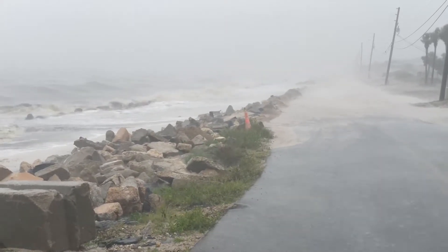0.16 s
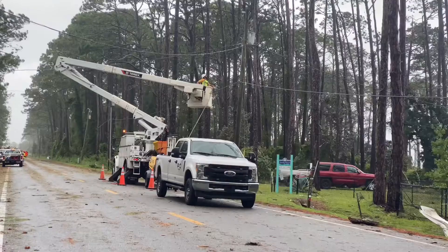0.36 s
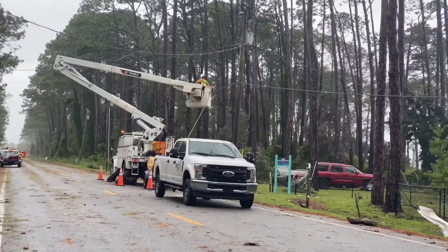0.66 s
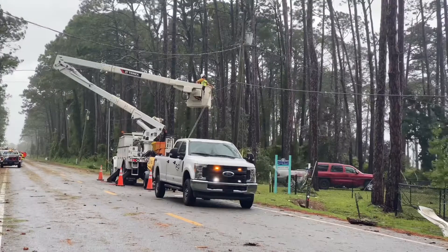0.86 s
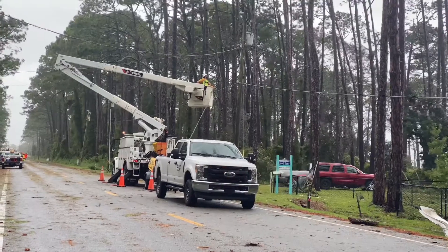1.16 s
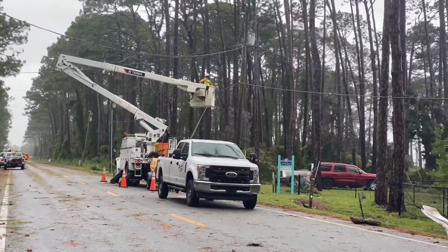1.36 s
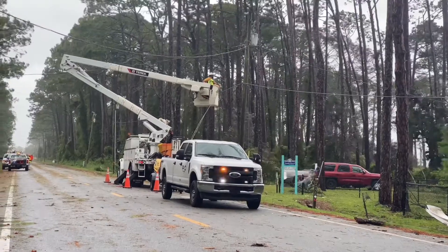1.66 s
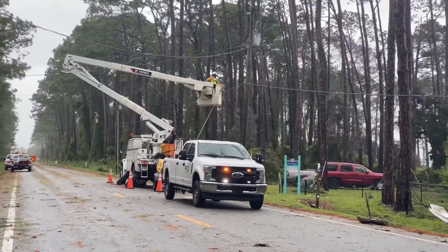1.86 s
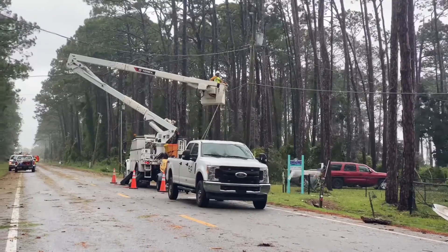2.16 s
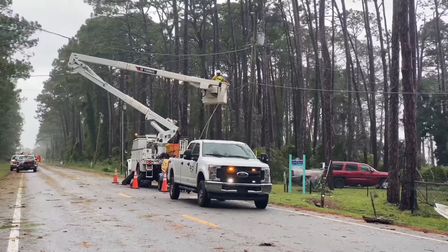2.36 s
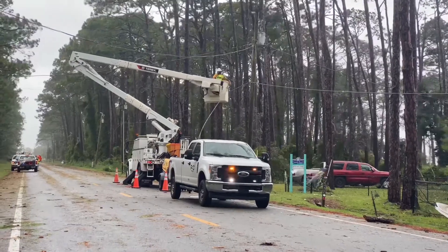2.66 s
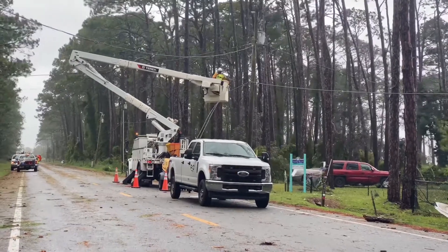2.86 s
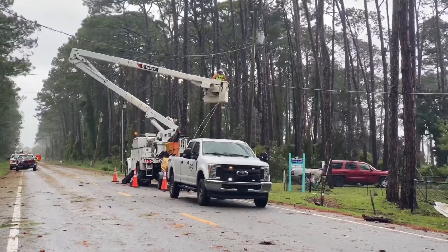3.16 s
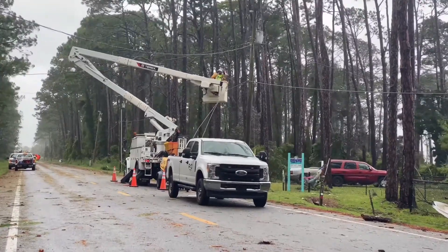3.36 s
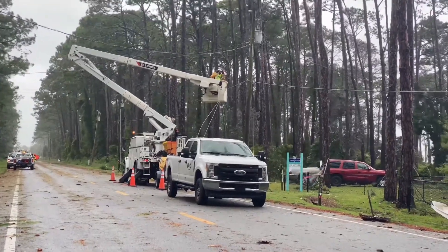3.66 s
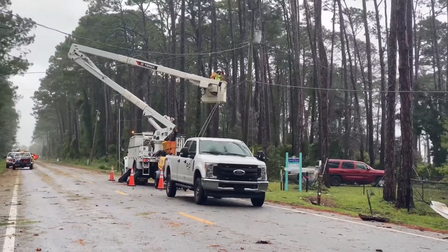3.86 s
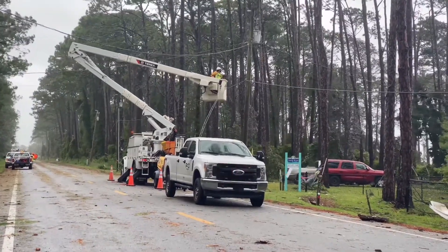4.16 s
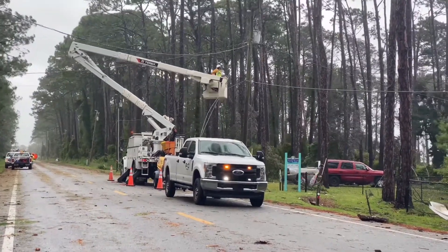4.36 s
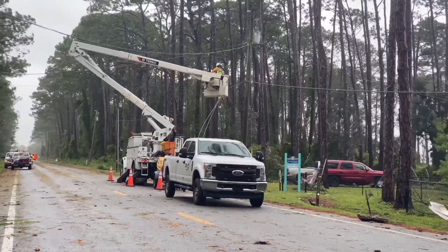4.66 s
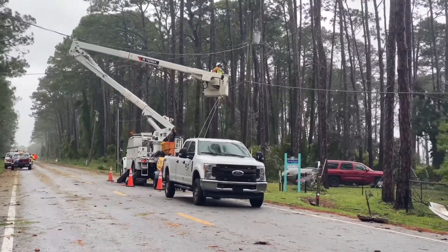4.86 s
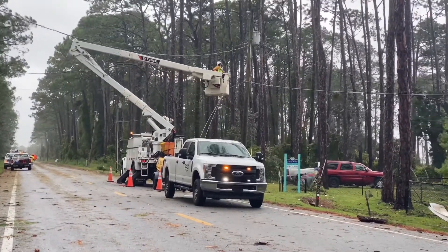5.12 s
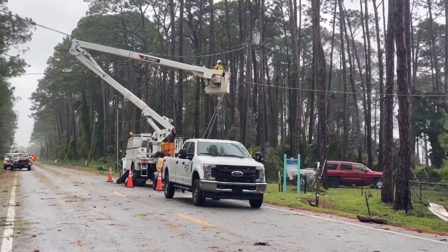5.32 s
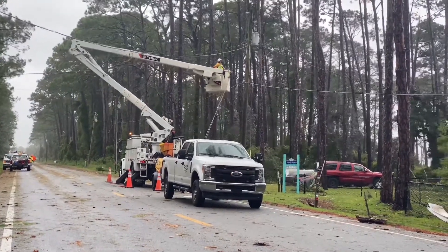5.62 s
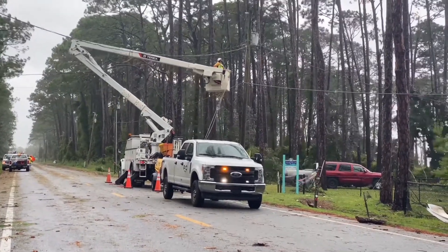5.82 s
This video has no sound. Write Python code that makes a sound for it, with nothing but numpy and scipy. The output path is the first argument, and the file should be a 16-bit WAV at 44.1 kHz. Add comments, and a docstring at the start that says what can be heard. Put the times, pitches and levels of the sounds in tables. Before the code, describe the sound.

From 0 to about 0.3 s, surf on an exposed shore hisses broadly above a soft, deep wind rumble. It dips to silence near 0.34 s, and wind among tall pines quickly rises, lasting to the end at about 6 s. The needles give a steady, bright hiss with little bass; the crowns add a mild mid-pitched rush that slowly swells and sinks. Low gusts flutter at the hand-held stereo microphone, busiest from 0.4 to 1.1 s, with a tight cluster of muffled knocks and one tick around 0.8-0.96 s. Then it is calmer, with scattered light rustles and a small tick near 2.05 s. A soft gust swells around 3.8 s. At 4.3-4.5 s come more knocks, the strongest a low thump at 4.5 s, with dry debris ticks. Sparse ticks follow at 4.8-5.15 s, then mostly even hiss with faint puffs. The trucks and worker are not heard.

```python
"""Surf on an exposed shore is heard first; it fades to silence and a stand of tall pines fades in.
Surf, needles and crowns are random noise shaped in pitch and level; gusts add power to a breeze.
Short bursts of noise buffet the two ports of a hand-held microphone, from the shore onwards.
Among the pines come damped sine knocks and the sharp, band-passed ticks of blown debris."""
import sys
import numpy as np
from scipy import signal
from scipy.fft import rfft, irfft
from scipy.io import wavfile
from scipy.ndimage import uniform_filter1d

SR = 44100
rng = np.random.default_rng(int(sys.argv[2]) if len(sys.argv) > 2 else 0)


def put_to_file(sound):
    """Save the sound as 16-bit audio at rate SR, in the file named by the first command-line argument."""
    columns = np.atleast_2d(sound).T  # one column per channel
    safe = np.clip(columns, -1, 1)
    whole_steps = np.round(safe * 32767)
    wavfile.write(sys.argv[1], SR, whole_steps.astype(np.int16))


N = 264047
TIME = np.arange(N) / SR
HZ = np.fft.rfftfreq(1024, 1 / SR)  # pitches of the noise frames
FRAME_S = np.arange(N // 256 + 5) * 256 / SR  # times of the noise frames

# Wind on the shore. Each row: time in seconds, rumble level in dB, surf level in dB.
SHORE_LEVELS = [(0, -46.5, -36.5), (.1, -48, -38.5), (.3, -45, -37.5)]
# Spectrum of the surf. Each row: frequency in Hz, density in dB per Hz, relative.
SURF_COLOUR = [(150, -43), (400, 3.5), (1200, 2.5), (1900, 6), (3000, 1), (4500, -1), (7000, -4),
               (8500, 2.5), (12000, -1), (14000, 2.5), (15700, -4)]
# Spectrum of the wind rumble on the shore. Each row: frequency in Hz, density in dB per Hz, relative.
RUMBLE_COLOUR = [(20, -14), (45, 0), (75, 1.5), (130, -3), (250, -5), (500, -18), (2000, -60)]
# Likeness of the two ports on the shore. Each row: frequency in Hz, coherence from 0 to 1.
SURF_COHERENCE = [(300, 1), (700, 0.61), (1400, 0.13), (3000, 0.94), (4000, 1), (7000, 1), (8000, 0.97),
                  (15000, 0.66)]
# Short flurries of air, from low buffets to light rustles.
# Each row: time of the peak in seconds, rms level at the peak in dB, pitch in Hz, length in seconds.
FLURRIES = [(0.275, -42, 814, 0.008), (0.46, -33.5, 252, 0.018), (0.485, -38, 770, 0.024),
            (0.537, -31, 620, 0.005), (0.669, -35, 450, 0.005), (0.795, -36, 403, 0.026),
            (0.821, -26.5, 434, 0.018), (0.827, -28.5, 760, 0.009), (0.838, -26.5, 330, 0.011),
            (0.853, -31, 280, 0.012), (0.884, -33, 450, 0.011), (0.917, -32.5, 470, 0.01),
            (0.939, -32, 330, 0.008), (0.959, -31, 284, 0.018), (0.974, -35, 290, 0.009),
            (0.996, -33, 306, 0.009), (1.016, -33, 432, 0.014), (1.033, -31, 470, 0.012),
            (1.083, -34, 680, 0.009), (1.385, -42, 450, 0.013), (1.651, -36, 624, 0.014),
            (1.75, -38, 780, 0.02), (1.815, -36, 730, 0.0097), (1.824, -60, 188, 0.011),
            (1.881, -36, 570, 0.012), (1.926, -34, 880, 0.014), (2.053, -34, 780, 0.007),
            (2.084, -46, 350, 0.0058), (2.109, -42, 420, 0.006), (2.183, -44, 450, 0.006),
            (2.204, -44, 500, 0.005), (2.33, -40, 547, 0.0067), (2.366, -34.5, 835, 0.0061),
            (2.483, -34, 950, 0.006), (2.778, -45, 230, 0.016), (2.831, -47, 220, 0.012),
            (3.342, -48, 280, 0.009), (3.374, -34.5, 690, 0.0065), (3.446, -39.5, 280, 0.014),
            (3.499, -41, 254, 0.012), (3.529, -41, 245, 0.018), (3.68, -46, 646, 0.021),
            (3.771, -40.5, 270, 0.018), (3.825, -39, 603, 0.0081), (3.861, -36, 263, 0.012),
            (3.922, -38, 406, 0.0074), (4.259, -36, 417, 0.011), (4.302, -36, 646, 0.0078),
            (4.353, -43, 395, 0.023), (4.402, -42, 436, 0.036), (4.438, -35, 1100, 0.006),
            (4.45, -33.5, 420, 0.018), (4.472, -31.5, 900, 0.008), (4.496, -31.5, 290, 0.017),
            (4.497, -34, 940, 0.012), (4.657, -44, 370, 0.014), (4.796, -30, 1110, 0.007),
            (4.824, -35, 1130, 0.0083), (4.944, -32, 780, 0.0071), (4.959, -35, 850, 0.0039),
            (5.033, -35, 890, 0.0049), (5.366, -37, 890, 0.0067), (5.743, -35, 676, 0.0067),
            (5.771, -45, 405, 0.007), (5.817, -47, 380, 0.0086), (5.88, -53, 340, 0.012)]
# Rush of the air through the crowns. Each row: time in seconds, level in dB before the low cut.
CROWN_LEVELS = [(0.5, -37.5), (0.7, -38), (0.97, -36.5), (1.45, -40.5), (1.68, -39), (1.78, -45),
                (1.87, -39.5), (2.2, -38), (2.6, -38.5), (3.3, -42.5), (4.0, -39.5), (4.13, -44.5),
                (4.38, -41.5), (4.46, -38), (4.9, -38), (5.03, -36.5), (5.2, -39.5), (5.5, -41),
                (5.95, -40.5)]
# Breeze near the ground. Each row: time in seconds, level in dB before the low cut.
BREEZE_LEVELS = [(0.5, -41.5), (1.2, -46.5), (1.35, -44), (1.65, -42.5), (1.76, -47), (1.97, -50),
                 (2.15, -45.5), (2.58, -48), (2.95, -42.5), (3.2, -43.5), (3.4, -41.5), (3.7, -39.5),
                 (4.0, -44), (4.28, -42.5), (4.58, -45.5), (4.68, -47), (4.8, -48), (5.25, -50.5),
                 (5.8, -46)]
# Gusts on top of the breeze. Each row: time of the peak in seconds, level in dB, length in seconds.
GUSTS = [(0.473, -34.5, 0.089), (0.68, -37.5, 0.023), (0.856, -37.5, 0.11), (0.99, -38, 0.081),
         (2.09, -48.5, 0.062), (2.812, -43.5, 0.055), (3.353, -46, 0.025), (3.5, -41.5, 0.039),
         (3.826, -36, 0.089), (4.3, -50, 0.07), (4.468, -43, 0.043)]
# Spectrum of the needles' hiss. Each row: frequency in Hz, density in dB per Hz, relative.
NEEDLE_COLOUR = [(300, -12.5), (900, 4), (2000, 1), (3000, 1), (3600, 0.5), (5000, -0.8), (6500, -3),
                 (7500, -4), (8400, 1.5), (10000, -1.5), (12000, -8.5), (14000, -6.5), (15600, -8.5)]
# Spectrum of the crowns' roar. Each row: frequency in Hz, density in dB per Hz, relative.
CROWN_COLOUR = [(300, -36), (700, -9.5), (1100, -3.5), (1450, -3), (1900, 2), (2400, -2.5), (2900, -3.5),
                (3600, -14.5), (7000, -20.5)]
# Spectrum of the wind near the ground. Each row: frequency in Hz, density in dB per Hz, relative.
GUST_COLOUR = [(100, 2.5), (280, -3), (450, 0), (740, 4), (1000, -4.5), (1400, -27.5), (2500, -26),
               (6000, -51)]
# Likeness of the ports for needles and crowns. Each row: frequency in Hz, coherence from 0 to 1.
PINE_COHERENCE = [(100, 0.27), (260, 0.62), (420, 1), (620, 0.97), (900, 0.87), (1300, 0.71), (1900, 1),
                  (2400, 1), (7000, 1), (8000, 0.89), (15000, 1)]
# Likeness of the ports for gusts, less alike in the bass. Each row: frequency in Hz, coherence.
GUST_COHERENCE = [(100, 0.2), (240, 0.4), (330, 0.8), (450, 0.92), (650, 0.97), (900, 0.9), (1300, 0.7),
                  (2000, 1)]
# Bands of the low roar that hollow out for a while.
# Each row: start in seconds, end in seconds, depth in dB, centre in Hz, width in octaves.
HOLLOWS = [(1.055, 1.3, 8, 270, .4), (1.64, 1.72, 14, 230, 0.44), (1.71, 1.792, 20, 410, 0.37),
           (1.898, 2.043, 16, 310, .35), (1.925, 2.04, 20, 620, .2), (2.185, 2.28, 7, 523, 0.44),
           (2.375, 2.463, 20, 630, .18), (2.47, 2.75, 6, 500, 0.5), (2.62, 2.755, 14, 240, .4),
           (3.016, 3.31, 42, 270, 0.6), (4.54, 4.604, 9, 520, .7), (4.77, 4.935, 16, 350, .4),
           (5.25, 5.72, 12, 280, 0.53), (5.905, 6.1, 28, 303, 0.57)]
# Low knocks and thumps. Each row: time of the peak in seconds, peak level in dB, pitch in Hz.
KNOCKS = [(0.412, -32, 323), (0.42, -40, 180), (0.535, -30, 330), (0.67, -39, 210), (0.752, -27.5, 430),
          (0.824, -20, 467), (0.84, -25.5, 308), (0.855, -29, 268), (0.883, -23.5, 306), (0.96, -28, 370),
          (1.828, -55, 63), (1.88, -54, 65), (2.069, -52, 196), (2.11, -56, 200), (4.322, -29, 166.4),
          (4.346, -47, 165), (4.368, -48, 168), (4.446, -23.5, 430), (4.473, -27, 413), (4.482, -31, 270),
          (4.498, -18, 143), (4.498, -23, 292), (4.839, -54.5, 88), (4.915, -68, 76)]
# Ticks of blown debris. Each row: start in seconds, peak level in dB, centre in Hz, decay in seconds.
TICKS = [(0.819, -24, 800, 0.0018), (2.054, -27, 1300, 0.004), (4.2997, -29, 1050, 0.0022),
         (4.438, -31, 1100, 0.003), (4.470, -21, 1100, 0.001), (4.823, -26, 1510, 0.0018),
         (4.942, -28, 1100, 0.0017), (5.038, -29, 1400, 0.002), (5.14, -30, 1700, 0.002)]

FADE_S, FADE_OUT_S, FADE_IN_S = 0.338, 0.055, 0.056  # moment of silence, and the ramps around it
# the right port leads above the split; the two would be in phase at the aligned pitch
PORT_LAG_S, PORT_SPLIT_HZ, PORT_ALIGNED_HZ = .000278, 7650, 6700
# width of a flurry in octaves below its pitch, and above it for a pitch of MIDDLE_HZ;
# higher flurries spread wider upwards, by this power of the pitch
MIDDLE_HZ, SKIRT_BELOW, SKIRT_ABOVE, SKIRT_GROWTH = 900, 0.25, 1.01, 0.23
NEEDLES_DB = -36.5  # steady hiss, before the low cut
# stronger wind reaches lower: lowest pitch at the usual level, the gain in level that lowers it
# an octave, and the pitch that not even the hardest gust reaches below
USUAL_DB, LOWEST_HZ, DB_PER_OCTAVE, DEEPEST_HZ = -43, 322.05, 11, 190
HOLLOW_EDGE_S = 0.0094  # how quickly a hollow opens and closes
# length of a knock at DEEP_HZ, and the power of pitch by which higher knocks are shorter
DEEP_HZ, KNOCK_S, KNOCK_SHORTENING = 150, 0.014, 0.63
KNOCK_LEAD_RAD = 1.9  # phase between the ports at DEEP_HZ, less on either side
RING_ON_DB, RING_ON_S = -17, 0.011  # faint ringing of the body after a knock: start and decay
TICK_SNAP = 5.4  # height of the first snap against the rms of the crackle at its start
EDGE_HZ = 15650  # upper band limit


def gain_of(db):
    """Logarithmic level: decibels to an amplitude factor."""
    return 10 ** (np.asarray(db) / 20)


def evened(x):
    """Normalisation: scales to an rms of one."""
    return x / np.sqrt(np.mean(x ** 2) + 1e-20)


def read(points):
    """Interpolation along logarithmic pitch: a table over frequency, read at every bin."""
    f, value = np.transpose(points)
    return np.interp(np.log(HZ + 1), np.log(f + 1), value)


def follow(rows, axis=1):
    """Linear interpolation in time: one column of a curve, read at every frame."""
    rows = np.array(rows)
    return np.interp(FRAME_S, rows[:, 0], rows[:, axis])[:, None]


def swell(t, length, rise):
    """Gaussian envelope: a bell around t = 0 whose rise is a given share of its dying length."""
    return np.exp(-(t / np.where(t < 0, rise * length, length)) ** 2)


def eddies(flicker_db, patchy_db):
    """Turbulent modulation in dB: a flicker shared by all pitches, and patches that come and go."""
    flicker = rng.standard_normal((len(FRAME_S), 1))
    flicker = evened(uniform_filter1d(flicker, size=3, axis=0))
    patches = rng.standard_normal((len(FRAME_S), len(HZ)))
    patches = uniform_filter1d(patches, size=9, axis=0)  # smooth in time
    patches = evened(uniform_filter1d(patches, size=14, axis=1))  # smooth in pitch
    return flicker_db * flicker + patchy_db * patches


def air(colour, level_db, coherence):
    """Partial coherence: coloured noise at two ports, part shared; one leads in the top treble."""
    a, b, c, d = rng.standard_normal((4, len(FRAME_S), len(HZ)))
    same = np.clip(read(coherence), -1, 1)
    left = a + 1j * b
    right = same * left + np.sqrt(1 - same ** 2) * (c + 1j * d)
    lead_hz = (HZ - PORT_ALIGNED_HZ) * (HZ > PORT_SPLIT_HZ)
    right = right * np.exp(2j * np.pi * PORT_LAG_S * lead_hz)
    spectra = np.array([left, right]) * evened(gain_of(read(colour))) * gain_of(level_db)
    noise = signal.istft(spectra.transpose(0, 2, 1), nperseg=1024, noverlap=768)[1]
    return noise[:, :N] / np.sqrt(341)  # overlapped random frames have a power of about 341


def shore():
    """Superposed noise sources: spray hisses over the breakers, wind rumbles on the microphone."""
    surf_db = follow(SHORE_LEVELS, axis=2) + eddies(flicker_db=1.3, patchy_db=1.7)
    surf = air(SURF_COLOUR, surf_db, SURF_COHERENCE)
    rumble_db = follow(SHORE_LEVELS) + eddies(flicker_db=3.5, patchy_db=1.5)
    rumble = air(RUMBLE_COLOUR, rumble_db, SURF_COHERENCE)
    return surf + rumble.mean(0)  # the rumble is the same at both ports


def flurries(rise=0.51, apart=0.081, size=8192):
    """Filtered turbulence: bursts cut steeply below a pitch; the lower, the more the ports differ."""
    out = np.zeros((2, N))
    hz = np.fft.rfftfreq(size, 1 / SR)
    for s, db, pitch_hz, length in FLURRIES:
        start = round(s * SR) - size // 2
        shape = swell(TIME[start:start + size] - s, length, rise)
        octaves = np.log2((hz + 1) / pitch_hz)
        above = SKIRT_ABOVE * (pitch_hz / MIDDLE_HZ) ** SKIRT_GROWTH
        skirt = np.where(octaves < 0, SKIRT_BELOW, above)
        bursts = rfft(shape * rng.standard_normal((2, size)))
        shared, own = irfft(bursts * np.exp(-(octaves / skirt) ** 2))
        difference = apart * MIDDLE_HZ / pitch_hz * evened(own)
        ports = evened(shared) + difference * np.array([[1], [-1]])
        out[:, start:start + size] += gain_of(db) * np.sqrt(np.mean(shape ** 2)) * ports
    return out


def ground_wind():
    """Addition of powers: level in dB of the breeze near the ground together with its gusts."""
    power = gain_of(follow(BREEZE_LEVELS)) ** 2
    for s, db, length in GUSTS:
        gust = gain_of(db) * swell(FRAME_S - s, length, rise=1)
        power = power + gust[:, None] ** 2
    return 10 * np.log10(power)


def low_edge(wind_db, steep_db=95, most_db=75):
    """High-pass loss in dB, steep then levelling off; its edge sinks as the wind blows harder."""
    lowest_hz = LOWEST_HZ * 2 ** ((USUAL_DB - wind_db) / DB_PER_OCTAVE)
    lowest_hz = np.maximum(lowest_hz, DEEPEST_HZ)
    octaves_below = np.maximum(np.log2(lowest_hz / (HZ + 1)), 0)
    return -most_db * np.tanh(steep_db * octaves_below / most_db)


def hollows():
    """Band-stop loss in dB: a band of the low roar drops out and comes back abruptly."""
    t, loss = FRAME_S[:, None], 0
    for start, end, db, hz, octaves in HOLLOWS:
        opened = np.tanh((t - start) / HOLLOW_EDGE_S)
        closed = np.tanh((t - end) / HOLLOW_EDGE_S)
        band = np.exp(-(np.log2((HZ + 1) / hz) / octaves) ** 2)
        loss = loss - db * (opened - closed) / 2 * band
    return loss


def pines():
    """Broadband wind noise: needles hiss evenly, crowns swell and sink, near gusts flutter."""
    wind_db = ground_wind()
    cut_db = low_edge(wind_db) + hollows()
    hiss_db = NEEDLES_DB + cut_db + eddies(flicker_db=0.43, patchy_db=1.07)
    hiss = air(NEEDLE_COLOUR, hiss_db, PINE_COHERENCE)
    rush_db = follow(CROWN_LEVELS) + cut_db + eddies(flicker_db=0.14, patchy_db=1.2)
    rush = air(CROWN_COLOUR, rush_db, PINE_COHERENCE)
    gust_db = wind_db + cut_db + eddies(flicker_db=2.0, patchy_db=1.53)
    gust = air(GUST_COLOUR, gust_db, GUST_COHERENCE)
    return hiss + rush + gust


def knocks(rise=0.6, rough_rad=0.16):
    """Damped oscillation: a quick swell, a few uneven cycles, and ports that feel it out of step."""
    out = np.zeros((2, N))
    for s, db, hz in KNOCKS:
        t = TIME - s
        length = KNOCK_S * (DEEP_HZ / hz) ** KNOCK_SHORTENING
        ring_on = (t > 0) * gain_of(RING_ON_DB) * np.exp(-abs(t) / RING_ON_S)
        shape = np.maximum(swell(t, length, rise), ring_on)
        lead = KNOCK_LEAD_RAD * min(DEEP_HZ / hz, hz / DEEP_HZ)
        # slow random phase makes the cycles uneven
        grit = uniform_filter1d(rng.standard_normal(N), size=70)
        grit = evened(uniform_filter1d(grit, size=70))
        phase = 2 * np.pi * (hz * t + rng.random()) + rough_rad * grit
        ring = np.sin(phase + np.array([[0], [lead]]))
        high_pass = signal.butter(3, hz / 2, "high", fs=SR, output="sos")
        out += signal.sosfiltfilt(high_pass, gain_of(db) * shape * ring)
    return out


def ticks():
    """Impulse excitation: a snap and a heavily damped crackle, filtered about two octaves wide."""
    out = np.zeros(N)
    for s, db, hz, decay in TICKS:
        burst = rng.standard_normal(N) * (TIME >= s) * np.exp(-abs(TIME - s) / decay)
        burst[round(s * SR)] += TICK_SNAP
        band_pass = signal.butter(4, [hz / 2, hz * 2], "band", fs=SR, output="sos")
        tick = signal.sosfilt(band_pass, burst + 1e-18)
        out += gain_of(db) * tick / abs(tick).max()
    return out


def scene():
    """Amplitude fading and superposition: the shore sinks to silence and the pines rise from it."""
    fade_out = (FADE_S - TIME) / FADE_OUT_S
    fade_in = (TIME - FADE_S) / FADE_IN_S
    fade = np.clip(np.maximum(fade_out, fade_in), 0, 1) ** 1.65
    place = np.where(TIME < FADE_S, shore(), pines())
    return fade * (place + flurries() + knocks() + ticks())


def record(dry):
    """Band limitation: a linear-phase low-pass, the band limit of the recorder."""
    low_pass = signal.firwin(511, EDGE_HZ, window=("kaiser", 9), fs=SR)
    return signal.oaconvolve(dry, low_pass[None], "same")


dry = scene()
out = record(dry)
put_to_file(out)
```